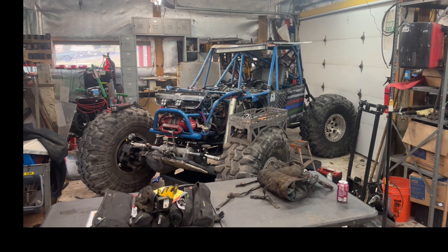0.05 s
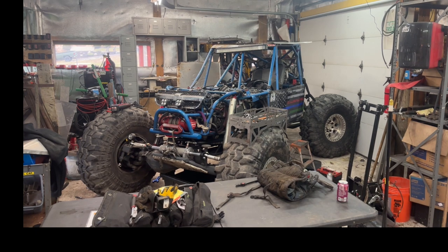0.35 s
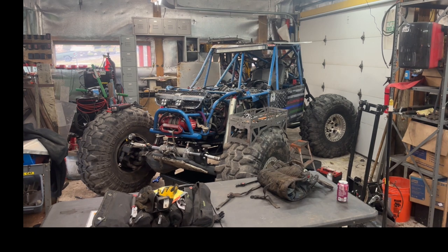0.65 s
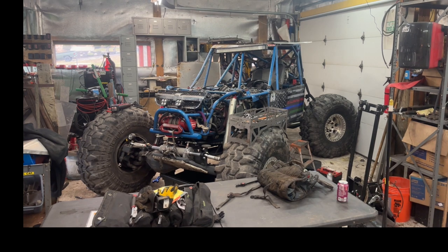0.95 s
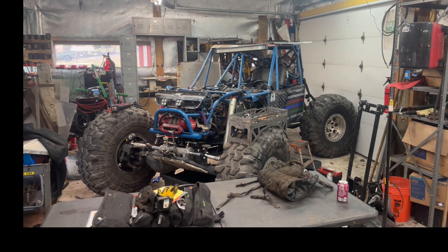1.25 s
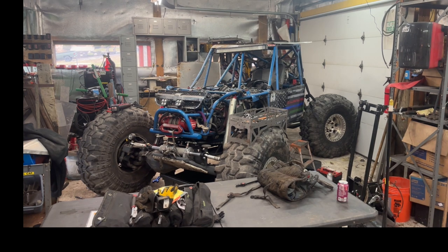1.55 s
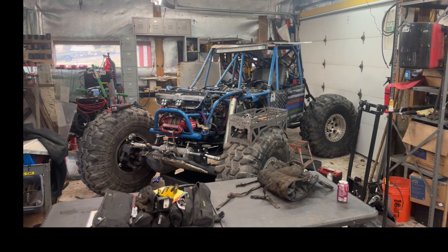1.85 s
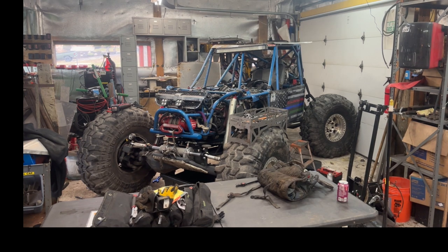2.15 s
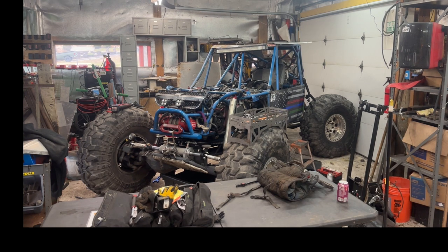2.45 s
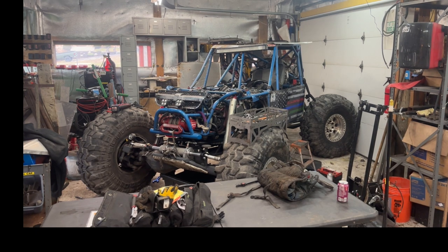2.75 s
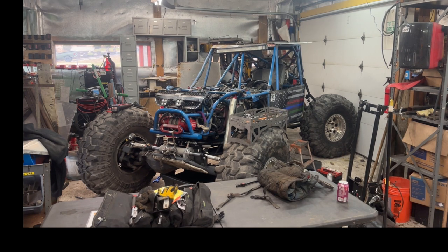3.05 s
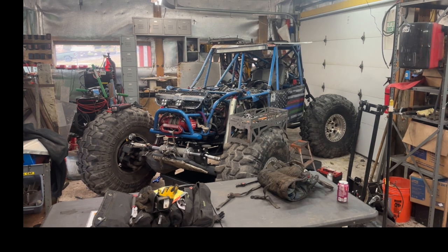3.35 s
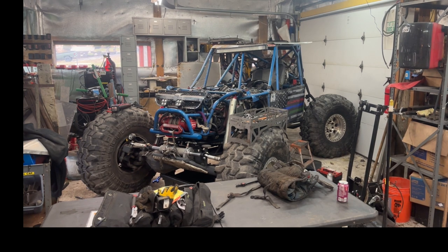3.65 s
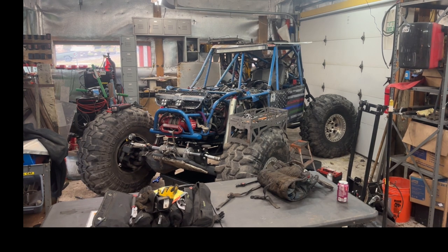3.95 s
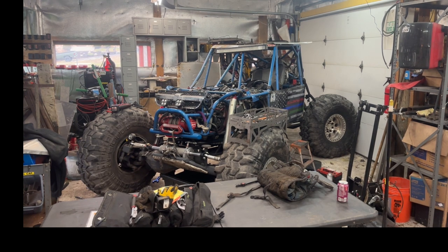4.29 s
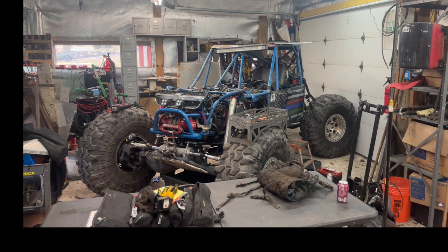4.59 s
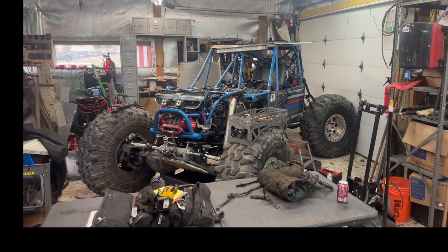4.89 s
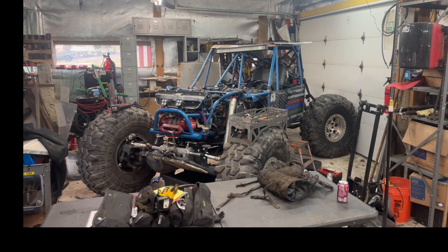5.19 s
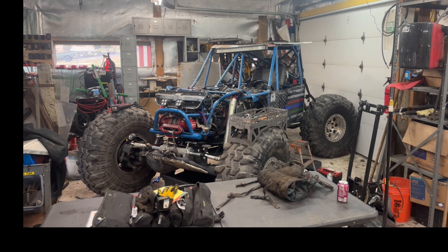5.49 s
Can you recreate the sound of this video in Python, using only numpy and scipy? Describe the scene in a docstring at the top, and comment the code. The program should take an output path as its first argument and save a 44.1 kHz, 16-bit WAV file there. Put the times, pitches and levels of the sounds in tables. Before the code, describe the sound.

A faint low rumble and electrical hum run throughout in a workshop with a short echo. At about 0.8 seconds something heavy clatters down on a bench with a sharp, solid knock. A thin metal part is bumped and rings lightly from 1 to 1.3 seconds, and a soft, dull thud follows at 1.5. At about 2.1 seconds metal parts start to drag, then crash together between 2.3 and 2.5 seconds, the loudest moment. They keep scraping with a juddering, hollow ring and several smaller clanks, weakening after 3.2 seconds and sliding to rest by about 3.8. From around 4.1 seconds to the end near 5.8, small things are handled with quiet, scattered clicks and brief rubs, the clearest cluster coming at about 4.7 seconds. The sound is in stereo, with the bench knock and clicks slightly to the left.

```python
"""Clatter in a garage workshop

Something heavy is knocked down on a bench and a thin metal part is bumped and rings. Metal parts are
then dragged, crash together and slide to rest, and a few small things are handled. Impacts and
stick-slip friction excite each body's modes; two microphone ports hear a short room over a low rumble."""
import sys
import numpy as np
from scipy import signal
from scipy.fft import rfft, irfft
from scipy.io import wavfile
from scipy.ndimage import uniform_filter1d

SR = 44100
rng = np.random.default_rng(int(sys.argv[2]) if len(sys.argv) > 2 else 0)


def master_out(mix):
    """Clip the mix to full scale and print it as 16-bit PCM to the path in sys.argv[1]."""
    frames = np.transpose(np.atleast_2d(mix))
    ceiling = np.clip(frames, -1, 1)
    pcm = np.round(ceiling * 32767).astype(np.int16)
    wavfile.write(sys.argv[1], SR, pcm)


N = 252693
TIME = np.arange(N) / SR

METAL_LAG_S = -0.000295  # negative: the metal is nearer the right port
# Each row: frequency in Hz, left minus right level in dB.
METAL_BALANCE = [(80, -0.5), (200, 4), (400, 0), (700, -4.5), (1300, 2), (2400, 1), (4400, 7.5),
                 (8000, 3.5), (14000, -2.5)]
def metal():
    """Superposition: blows and a dragged edge sound the thin metal, which radiates little bass."""
    slide_force, slide_hz = sliding()
    pressure = slide_force * amp(2.2 * wander(rate=120))  # the edge judders as it bites and lets go
    pair = struck_and_scraped(pressure, slide_hz) + clacks(slide_force)
    pair += hollow(pressure) + support(pressure)
    left, right = highpass(pair, hz=85)
    half = np.array(METAL_BALANCE) * [1, 0.5]
    return np.array([convolve(left, response(half)), convolve(right, response(half * [1, -1]))])


def struck_and_scraped(pressure, slide_hz, spots=8):
    """Forced vibration: blows and sliding catches drive several spots, each with its own room paths."""
    pushes = np.zeros((spots, N))
    for k, (start, db, hz, thump_db) in enumerate(contacts()):
        add(pushes[k % spots], start, amp(db) * blow(hz, thump_db))
    sharpness = 1 - np.exp(-2 * np.pi * slide_hz / SR)  # fast sliding gives sharper catches
    pair = np.zeros((2, N))
    for push in pushes:
        free = metal_ring()
        damped = unit(free * fade(t60=0.22, size=len(free)))  # an edge in contact damps the ring
        catches = friction(rate=70, spread_db=2.8) * pressure / np.sqrt(spots)
        catches = sharpness * catches + (1 - sharpness) * soften(catches, hz=1290)
        pair += room(convolve(push, free) + convolve(catches, damped), METAL_LAG_S, wet_db=6.5)
    return pair


# Each row: start in seconds, level in dB, brightness in Hz, thump in dB relative to the level.
METAL_BLOWS = [(1.006, -29.5, 8700, -47), (1.07, -36, 7500, 0), (1.291, -35, 2240, -1.5),
               (2.109, -28.5, 6640, 2.5), (2.185, -35.5, 2960, 15.5), (2.326, -17.5, 5500, 4),
               (2.363, -15, 4870, 6), (2.370, -14, 7000, -1.5), (2.387, -25.5, 3000, 6),
               (2.394, -22, 1390, 6), (2.421, -25.5, 1290, 5), (2.430, -17, 6000, -1.5),
               (2.441, -34, 9300, -22), (2.53, -16.5, 6500, -35), (2.68, -31.5, 6000, -7),
               (2.76, -24, 8000, 0), (2.815, -27.5, 10000, -12), (2.903, -25.5, 6100, -16),
               (2.987, -21.5, 9000, -1.5), (3.036, -30, 4000, 8), (3.135, -28, 5870, -1),
               (3.364, -29.5, 2800, 0), (3.44, -32.5, 2500, 3), (3.602, -61, 14000, -6),
               (3.693, -35.5, 3150, 4), (3.715, -40.5, 3500, 1)]
def contacts(seat_s=0.024, seat_db=-15.5, extra_thump_db=0.5):
    """Double impact: a part lands on one edge, then drops flat with less ring and as much weight."""
    for start, db, hz, thump_db in METAL_BLOWS:
        yield start, db, hz, thump_db
        yield start + seat_s, db + seat_db, hz, thump_db + extra_thump_db - seat_db


def blow(hz, thump_db, chatter_s=0.008, chatter_db=3, size=1024):
    """Contact force: a touch and a brief chatter; a light blow rebounds, leaving low modes quiet."""
    chatter = unit(rng.standard_normal(size) * (TIME[:size] < chatter_s))
    push = soften(unit(signal.unit_impulse(size) + amp(chatter_db) * chatter), hz)
    lightness = 1 / (1 + amp(thump_db + 30.5))
    return push - lightness * soften(push, hz=600)


# Each row: start in seconds, length in seconds, level in dB, brightness in Hz.
SHOVES = [(0.998, 0.022, -32.5, 7000), (2.119, 0.1, -30, 6000), (2.211, 0.2, -32.5, 4000),
          (2.363, 0.49, -17.5, 5940), (2.722, 0.098, -26.5, 6100), (2.877, 0.1, -27, 5040),
          (2.973, 0.13, -27.5, 4750), (3.137, 0.11, -28, 4260), (3.273, 0.28, -42.5, 2400),
          (3.505, 0.14, -38, 1980), (3.691, 0.046, -39, 3150), (3.783, 0.4, -55.5, 566)]
def sliding(sag_db_per_s=23.5):
    """Sliding friction: each shove's force sags as it goes; brightness is a force-weighted mean."""
    total, weighted_hz = np.zeros((2, N))
    for start, length, db, hz in SHOVES:
        sag_db = sag_db_per_s * np.clip(TIME - start, 0, length)
        force = stroke(start, length, attack_s=0.022, release_s=0.017) * amp(db - sag_db)
        total += force
        weighted_hz += force * hz
    return total, weighted_hz / (total + 1e-12)


# The strongest modes. Each row: frequency in Hz, relative level in dB, 60 dB decay time in seconds.
METAL_MODES = [(335, -4, 0.5), (444, 0, 0.5), (470, -3, 0.5), (587, -1, 0.65), (899, -5, 0.7),
               (934, -3, 0.6), (727, -11, 1.1), (1114, -4, 1.3), (1497, -2, 1.1), (1663, -10, 1.3),
               (1846, -8, 1.0), (2205, -7, 1.0), (2288, -4, 1.4), (2487, -11, 1.1), (2780, -13, 1.0)]
# The dense modes. Each row: frequency in Hz, relative level in dB.
METAL_SPECTRUM = [(60, -15), (200, -17.5), (260, -13), (340, -4.5), (500, 1), (900, 3.5), (1300, 2),
                  (2000, 0), (3200, -2), (4400, -8.5), (6800, -7), (8200, -10), (9600, -7.5), (15000, -0.5)]
# Their damping. Each row: frequency in Hz, 60 dB decay time in seconds.
METAL_T60 = [(100, 0.16), (400, 1), (1200, 0.98), (3000, 0.66), (7000, 0.41), (14000, 0.35)]
def metal_ring(modes_db=-21, crack_db=17, size=48000):
    """Modal response of thin metal at one spot: a dense wash of modes and a few that stand out."""
    wash = tail(METAL_T60, size)
    wash[0] = amp(crack_db)
    tones = np.zeros(size)
    for hz, db, t60 in METAL_MODES:
        spot, load = rng.standard_normal(2)  # the spot sets a mode's sign, the load detunes it
        tones += np.sign(spot) * ringing([(hz * (1 + 0.0036 * load), db, t60)], size)
    return convolve(wash, body(METAL_SPECTRUM)) + amp(modes_db) * tones


# Each row: frequency in Hz, relative level in dB.
CLACK_SPECTRUM = [(150, -22), (500, -14), (900, 9.5), (1900, 6), (3200, 2), (4500, -1.5), (7000, -4.5),
                  (15000, -26)]
def clacks(slide_force, rattle_db=-25):
    """Acceleration noise: the stiff striking part stops at once; loose pieces rattle during a slide."""
    force = np.zeros(N)
    for start, db, hz, _ in contacts():
        clack_db = db + 0.4 * (db + 24)  # the clack grows faster than the blow
        add(force, start, amp(clack_db) * soften(impact(t60=0.05, crack_db=14), hz))
    jolts = slide_force * friction(rate=55, spread_db=1.5)
    force += amp(rattle_db) * convolve(jolts, impact(t60=0.01, crack_db=13))
    return room(convolve(force, body(CLACK_SPECTRUM)), METAL_LAG_S, wet_db=1)


# Each row: frequency in Hz, bandwidth in Hz, relative level in dB.
HOLLOW_RESONANCES = [(453, 16, 0), (590, 14, -6.5), (912, 24, -6), (1100, 24, -9.5), (1505, 14, -12),
                     (2295, 20, -14)]
# The shifting load bends the lowest resonance. Each row: time in seconds, pitch ratio.
LOAD_BEND = [(2.42, 0.975), (2.57, 1.035), (2.75, 1.0), (2.95, 0.99), (3.14, 1.03), (3.38, 0.97)]
def hollow(pressure, waver=0.015):
    """Driven resonance: the dragged edge sustains the metal's hollow tones, whose pitches drift."""
    drive = pressure * friction(rate=330, spread_db=1.0)
    bends = [np.interp(TIME, *np.transpose(LOAD_BEND))]
    bends += [1 + waver * wander(rate=5) for _ in HOLLOW_RESONANCES[1:]]
    drone = sum(amp(db) * resonate(drive, hz * bend, width)
                for (hz, width, db), bend in zip(HOLLOW_RESONANCES, bends))
    return amp(-10.5) * room(drone, METAL_LAG_S, wet_db=2)


# Each row: frequency in Hz, relative level in dB.
SUPPORT_SPECTRUM = [(30, -35.5), (65, -3.5), (100, -9.5), (130, -8.5), (160, -9), (198, -3.5), (245, -14),
                    (325, -1), (420, -5.5), (700, -4.5), (1200, -23.5), (4000, -64)]
def support(pressure, growth=0.63):
    """Structure-borne sound: what the metal rests on thumps under blows and rumbles under sliding."""
    force = amp(-19.5) * pressure ** growth * friction(rate=580, spread_db=4.0)
    for start, db, _, thump_db in contacts():
        add(force, start, amp(db + thump_db) * impact(t60=0.023, crack_db=-16.5))
    return room(convolve(force, body(SUPPORT_SPECTRUM)), METAL_LAG_S, wet_db=7)


# Each row: start in seconds, level in dB, brightness in Hz, thump in dB relative to the level,
# level of the edge's crack in dB.
BENCH_KNOCKS = [(0.752, -42, 2000, -14, -41), (0.778, -21.5, 2390, -19, -14.5),
                (0.7856, -26.5, 2770, -8, -15), (0.789, -17.5, 12000, -10.5, -16.5),
                (0.796, -12.5, 4940, -6.5, -10.5), (0.8043, -22, 900, 3.5, -36.5),
                (0.816, -17, 1190, -11.5, -21.5)]
# The top's low modes. Each row: frequency in Hz, relative level in dB, 60 dB decay time in seconds.
BENCH_MODES = [(130, 0.5, 0.12), (191, 1.5, 0.087), (268, 0.5, 0.068), (322, -9.5, 0.25), (543, 3, 0.19),
               (660, -9, 0.16), (773, 4.5, 0.13), (954, -13, 0.14)]
# The top's dense modes and the hard edge. Each row: frequency in Hz, relative level in dB.
BENCH_SPECTRUM = [(60, -23), (200, -7.5), (500, 8), (800, 7.5), (1200, 2), (2100, -8), (3500, -13),
                  (7000, -30), (15000, -19)]
EDGE_SPECTRUM = [(300, -24), (700, -9), (1400, 2), (2100, 4), (3200, -5), (4600, -5), (7500, -8),
                 (10000, -17), (15000, -15)]
def bench(size=16384):
    """Impact on a plate: a hard edge clatters down, then the full weight lands and the top booms."""
    knocks, thumps, cracks = np.zeros((3, N))
    for start, db, hz, thump_db, edge_db in BENCH_KNOCKS:
        add(knocks, start, amp(db) * soften(impact(t60=0.035, crack_db=12.5), hz))
        add(thumps, start, amp(db + thump_db) * ringing(BENCH_MODES, size))
        # a light touch skitters, the full weight seats at once
        add(cracks, start, amp(edge_db) * soften(impact(t60=0.014, crack_db=db + 27), hz))
    top = room(convolve(knocks, body(BENCH_SPECTRUM)), lag_s=-0.000025, wet_db=3)
    edge = room(convolve(cracks, body(EDGE_SPECTRUM)), lag_s=-0.000025, wet_db=2)
    radiated = highpass(thumps, hz=75)  # the top is too small to radiate the deepest bass
    boom = room(soften(radiated, hz=1510), lag_s=0, wet_db=-15)
    return pan_left(top + edge, db=2.5) + pan_left(boom, db=4)


# Each row: start in seconds, level in dB, brightness in Hz.
PADDED_BUMPS = [(0.078, -47, 600), (0.422, -47.5, 800), (1.501, -31, 800), (1.518, -28.5, 355)]
# Each row: frequency in Hz, relative level in dB.
PADDED_SPECTRUM = [(40, -8), (100, 4.5), (170, -6), (270, -2.5), (350, -13.5), (450, -3), (600, -31),
                   (2500, -35)]
def bumps(rock_s=1.041, period_s=0.044, rock_db=-34, rock_hz=70):
    """Cushioned impact: soft, heavy contacts and three even rocks of the weight carry little treble."""
    force = np.zeros(N)
    rocks = [(rock_s + k * period_s, rock_db, rock_hz) for k in range(3)]
    for start, db, hz in PADDED_BUMPS + rocks:
        add(force, start, amp(db) * soften(impact(t60=0.072, crack_db=4.5), hz))
    thuds = convolve(force, body(PADDED_SPECTRUM))
    return pan_left(room(thuds, lag_s=0, wet_db=-9), db=3)


# Each row: start in seconds, level in dB, brightness in Hz, ring in Hz, ring in dB relative to the level.
SMALL_CLICKS = [(0.416, -59.5, 5000, 865, 4), (0.687, -57.5, 3000, 1280, 2),
                (4.114, -55.5, 7950, 2920, -9.5), (4.525, -50, 2200, 1210, 4), (4.549, -49, 3000, 1430, 8),
                (4.666, -46.5, 4000, 3900, -4), (4.677, -44, 2400, 940, 3), (4.70, -41.5, 2000, 1100, 0),
                (4.736, -38, 6400, 1160, -4), (4.747, -36, 3600, 1250, -2.5), (4.76, -47, 2000, 900, 3),
                (4.998, -48.5, 5100, 1370, -3), (5.015, -46, 1800, 880, -7), (5.18, -53.5, 3000, 1900, -7),
                (5.297, -54, 3470, 2700, -8), (5.318, -48, 2400, 1320, -0.5), (5.407, -50.5, 2400, 970, 1),
                (5.515, -59.5, 5000, 2180, 10.5), (5.706, -44.5, 11000, 2400, 0)]
# Each row: frequency in Hz, relative level in dB.
SMALL_SPECTRUM = [(80, -9.5), (250, -11), (430, 5), (650, -4.5), (1000, -7), (1500, -1), (2400, -13),
                  (4000, -12.5), (7000, -16), (15000, -20)]
def handling(graze_s=0.004, ring_cycles=11, size=8192):
    """Damped vibration: small things graze, click and ring briefly as they are handled and rubbed."""
    force, rings = np.zeros((2, N))
    onset = np.minimum(TIME[:size] / graze_s, 1)
    for start, db, hz, ring_hz, ring_db in SMALL_CLICKS:
        ring = unit(ringing([(ring_hz, 0, ring_cycles / ring_hz)], size))
        push = amp(db) * impact(t60=0.082, crack_db=6) * onset
        add(force, start, soften(soften(push, hz), hz))
        add(rings, start, amp(ring_db) * convolve(push, ring))
    clicks = amp(9) * convolve(force, body(SMALL_SPECTRUM)) + rings
    return pan_left(room(clicks + rubbing(), lag_s=-0.000025, wet_db=4), db=2.5)


# Each row: start in seconds, length in seconds, final level in dB.
HAND_RUBS = [(-0.1, 0.099, -51.5), (0.701, 0.13, -40.5), (1.824, 0.36, -51), (4.421, 0.095, -54),
             (4.998, 0.14, -52.5), (5.205, 0.11, -57.5), (5.382, 0.41, -45)]
# Each row: frequency in Hz, relative level in dB.
RUB_SPECTRUM = [(100, -11), (450, 4), (1400, 0.5), (2600, -9), (6000, -13), (9500, -17), (15000, -6.5)]
def rubbing(swell_db=17.5):
    """Friction noise: each rub swells as the hand takes hold and dies as it lets go."""
    grip = np.zeros(N)
    for start, length, db in HAND_RUBS:
        remaining = np.clip(1 - (TIME - start) / length, 0, 1)
        grip += stroke(start, length, attack_s=0.007, release_s=0.051) * amp(db - swell_db * remaining)
    return convolve(grip * friction(rate=1400, spread_db=0.5), body(RUB_SPECTRUM))


# Each row: frequency in Hz, relative spectral density in dB.
AMBIENT_SPECTRUM = [(15, -44), (25, -19), (45, -13.5), (109, 1.5), (146, -9), (301, -14.5), (529, -16),
                    (604, -13.5), (903, -18), (1210, -19), (1460, -20), (2850, -31.5), (4040, -34),
                    (15000, -47)]
# Each row: frequency in Hz, level in dB.
MAINS_HUM = [(60, -61.5), (120, -61.5)]
def background():
    """Stationary noise: a diffuse low rumble and faint hiss, with the steady tones of mains hum."""
    air = diffuse(*(convolve(noise, body(AMBIENT_SPECTRUM)) for noise in rng.standard_normal((2, N))))
    hum = sum(amp(db) * np.sin(2 * np.pi * (hz * TIME + rng.random())) for hz, db in MAINS_HUM)
    return pan_left(amp(-57) * air + hum, db=2)


# Each row: frequency in Hz, reverberation time in seconds.
ROOM_T60 = [(100, 0.49), (400, 0.34), (1500, 0.23), (5000, 0.31), (14000, 0.29)]
def room(x, lag_s, wet_db, size=18000):
    """Reverberation: scattered echoes follow the direct sound, which reaches the right port lag_s later."""
    build_up = 1 - np.exp(-TIME[:size] / 0.0006)
    walls = diffuse(*(unit(tail(ROOM_T60, size) * build_up) for _ in range(2)))
    lag = round(lag_s * SR)
    direct = np.array([signal.unit_impulse(size, max(late, 0)) for late in (-lag, lag)])
    paths = (direct + amp(wet_db) * walls) / np.hypot(1, amp(wet_db))
    return np.array([convolve(x, even_out(path)) for path in paths])


# Each row: frequency in Hz, coherence between the ports from 0 to 1.
PORT_COHERENCE = [(100, 0.97), (250, 0.53), (600, 0.05), (2000, 0.3), (8000, 0), (14000, 0)]
def diffuse(first, second):
    """Diffuse field: two unrelated noises mix to be alike at the ports in the bass, less so above."""
    size = len(first)
    coherence = np.clip(across(PORT_COHERENCE, np.fft.rfftfreq(size, 1 / SR)), 0, 1)
    mid = rfft(first) * np.sqrt((1 + coherence) / 2)
    side = rfft(second) * np.sqrt((1 - coherence) / 2)
    return np.array([np.roll(irfft(mid + side, size), 1), irfft(mid - side, size)])


def even_out(path):
    """Equalisation: flattens the echo response's broad humps and dips so the room is even, not boxy."""
    hz = np.fft.rfftfreq(len(path), 1 / SR)
    power = np.abs(rfft(path)) ** 2
    humps_db = 10 * np.log10(uniform_filter1d(power, size=15) / uniform_filter1d(power, size=240))
    return convolve(path, response(np.c_[hz + 1, -humps_db]))


def impact(t60, crack_db, size=8192):
    """Impulsive force: the crack of first contact and the short shudder after it."""
    force = rng.standard_normal(size) * fade(t60, size)
    force[0] = amp(crack_db)
    return force


def friction(rate, spread_db):
    """Stick-slip: about rate random catches a second, of unequal size, with an rms of one."""
    catches = (rng.random(N) < rate / SR) * rng.choice([-1, 1], N)
    sizes = amp(spread_db * np.minimum(rng.exponential(size=N), 4))
    return unit(catches * sizes) * np.sqrt(N)


def ringing(modes, size):
    """Free vibration: one decaying sine for each (Hz, dB, t60) row."""
    return sum(amp(db) * fade(t60, size) * np.sin(2 * np.pi * hz * TIME[:size]) for hz, db, t60 in modes)


def tail(t60s, size):
    """Modal overlap: countless modes merge into noise whose bands each die at their own rate."""
    noise = rfft(rng.standard_normal(size))
    hz = np.fft.rfftfreq(size, 1 / SR)
    centres, times = np.transpose(t60s)
    shares = (across(np.c_[centres, band], hz) for band in np.eye(len(centres)))
    return sum(irfft(noise * share, size) * fade(t60, size) for share, t60 in zip(shares, times))


def resonate(x, hz, width):
    """Resonance with a moving centre; the power it passes from white noise is independent of width."""
    turn = np.exp(2j * np.pi * np.cumsum(hz) / SR)
    return np.real(turn * soften(x / turn, width / 2)) * 2 * np.sqrt(SR / (np.pi * width))


def soften(x, hz):
    """One-pole low-pass at brightness hz: a softer contact pushes for longer and loses treble."""
    pole = np.exp(-2 * np.pi * hz / SR)
    return signal.lfilter([1 - pole], [1, -pole], x)


def highpass(x, hz):
    """Radiation efficiency: a body's output falls 12 dB an octave below hz."""
    return signal.sosfilt(signal.butter(2, hz, "highpass", fs=SR, output="sos"), x)


def response(points, size=4096):
    """Minimum-phase impulse response of a (Hz, dB) spectrum."""
    gain = amp(across(points, np.fft.rfftfreq(size, 1 / SR)))
    cepstrum = irfft(np.log(gain))
    cepstrum[1:size // 2] *= 2
    cepstrum[size // 2 + 1:] = 0
    return irfft(np.exp(rfft(cepstrum)))


def body(spectrum):
    """A body as a linear filter: its impulse response at unit energy."""
    return unit(response(spectrum))


def stroke(start, length, attack_s, release_s):
    """Envelope of one movement: attack, hold, exponential release."""
    age = TIME - start
    return np.clip(age / attack_s, 0, 1) * np.exp(-np.maximum(age - length, 0) / release_s)


def wander(rate):
    """Random modulation: about rate changes a second, with a spread near one."""
    levels = rng.standard_normal(1024)
    return 1.32 * np.interp(TIME * rate, np.arange(len(levels)), levels)


def fade(t60, size):
    """Exponential decay, 60 dB in t60 seconds."""
    return np.exp(-np.log(1000) * TIME[:size] / t60)


def pan_left(pair, db):
    """Level difference: the left port is louder than the right by db."""
    return pair * amp([[db / 2], [-db / 2]])


def convolve(x, impulse_response):
    """Linear filtering that keeps the sound's length."""
    return signal.fftconvolve(x, impulse_response)[:len(x)]


def across(points, hz):
    """Interpolation of (Hz, value) rows on a log-frequency axis."""
    centres, values = np.transpose(points)
    return np.interp(np.log(hz + 1), np.log(centres), values)


def add(track, start_s, sound):
    """Superpose a sound on a track."""
    start = int(start_s * SR)
    track[start:start + len(sound)] += sound[:N - start]


def unit(x):
    """Normalisation to unit energy."""
    return x / np.sqrt(np.sum(x ** 2))


def amp(db):
    """Decibels to amplitude ratio."""
    return 10 ** (np.asarray(db) / 20)


def scene():
    """Superposition: the pressures of all sources add at the two ports."""
    return metal() + bench() + bumps() + handling() + background()


# Each row: frequency in Hz, gain in dB.
MICROPHONE_RESPONSE = [(100, 0.5), (9800, 4.5), (11000, -7.5), (15000, -15.5)]
def record(dry, cutoff_hz=15700):
    """Saturation and band limiting: the microphone rounds peaks, dulls the top octave, then cuts off."""
    heard = np.array([convolve(np.tanh(port), response(MICROPHONE_RESPONSE)) for port in dry])
    return signal.sosfilt(signal.ellip(10, 0.2, 80, cutoff_hz, fs=SR, output="sos"), heard)


dry = scene()
out = record(dry)
master_out(out)
```